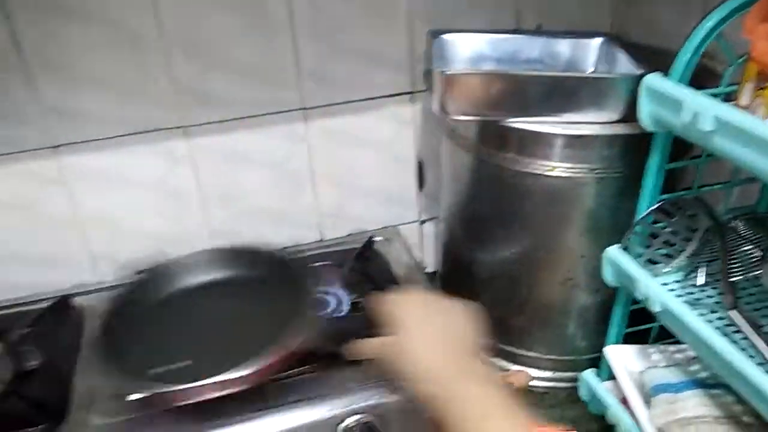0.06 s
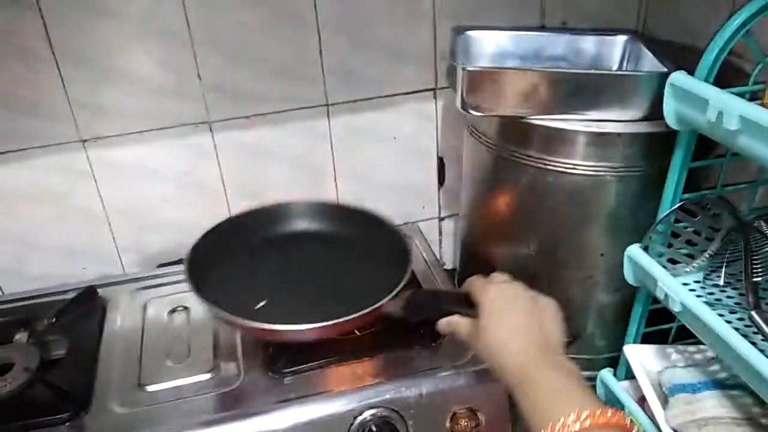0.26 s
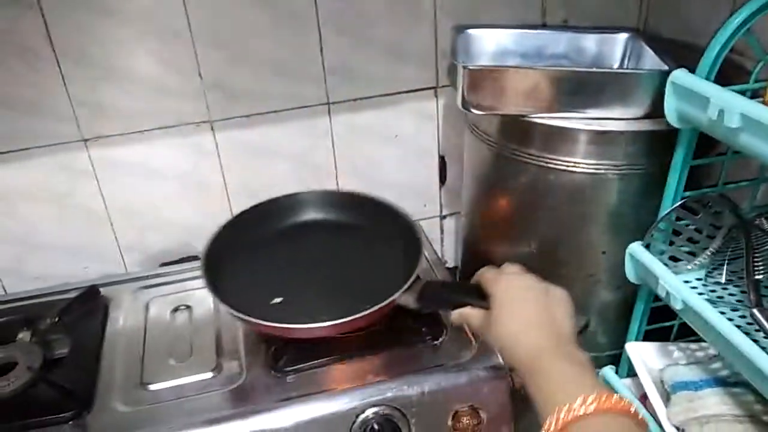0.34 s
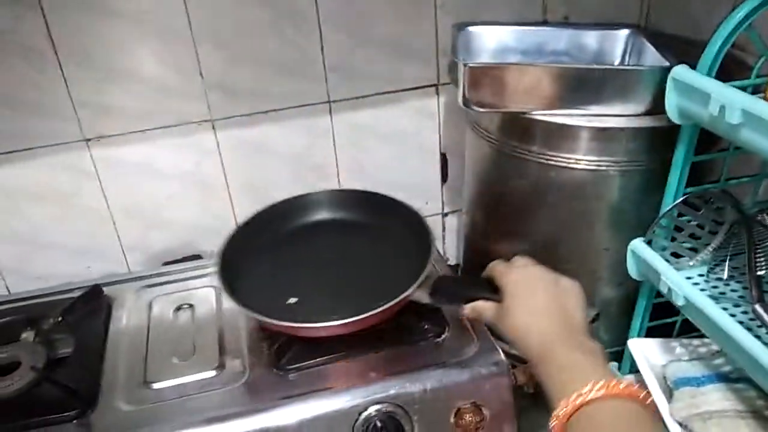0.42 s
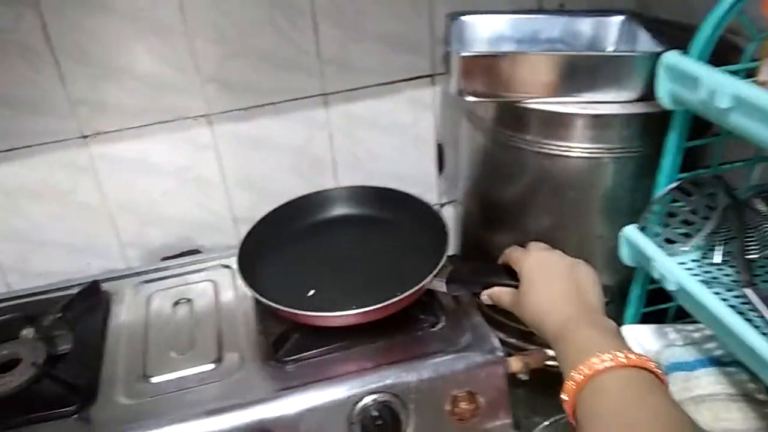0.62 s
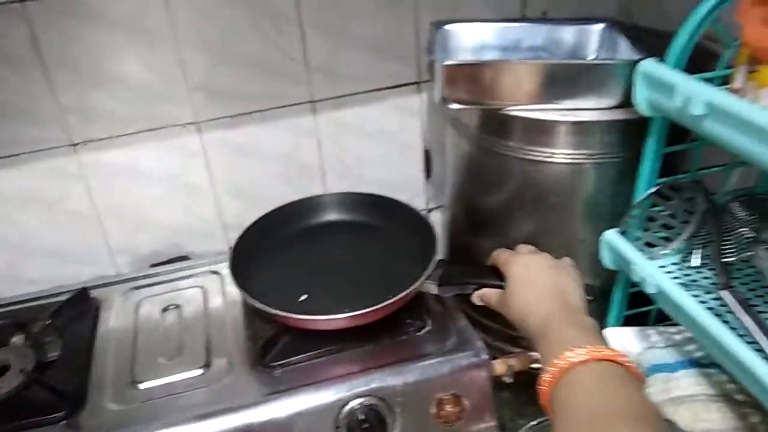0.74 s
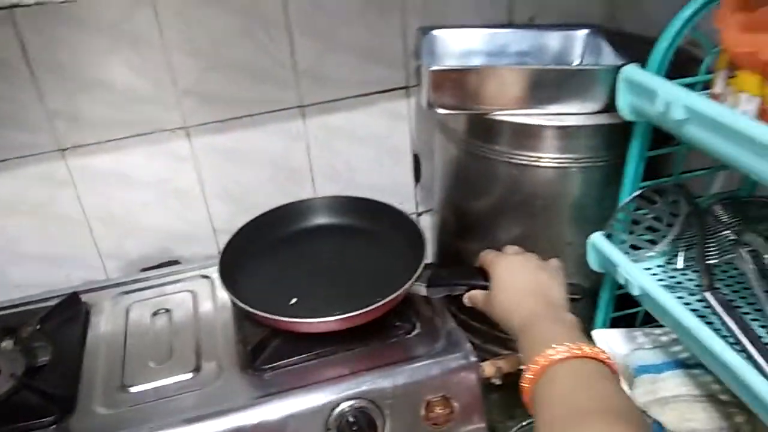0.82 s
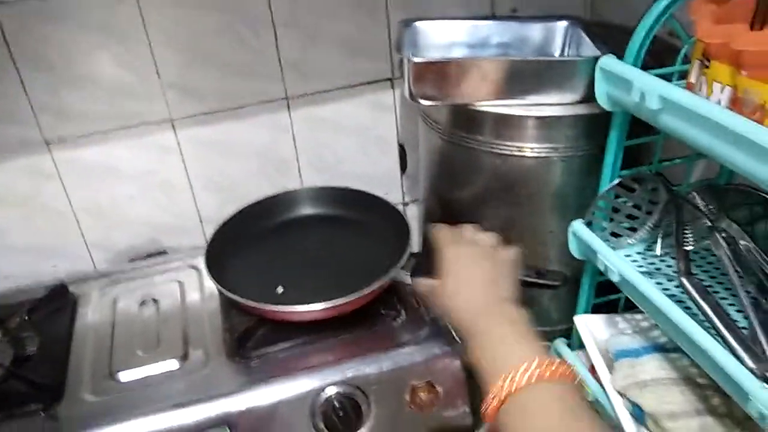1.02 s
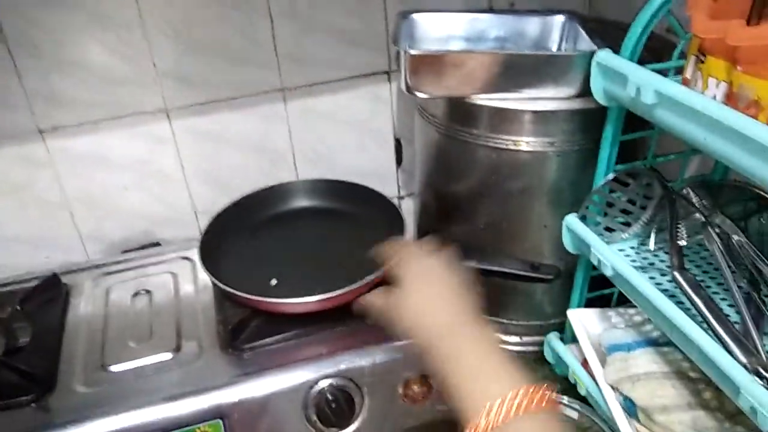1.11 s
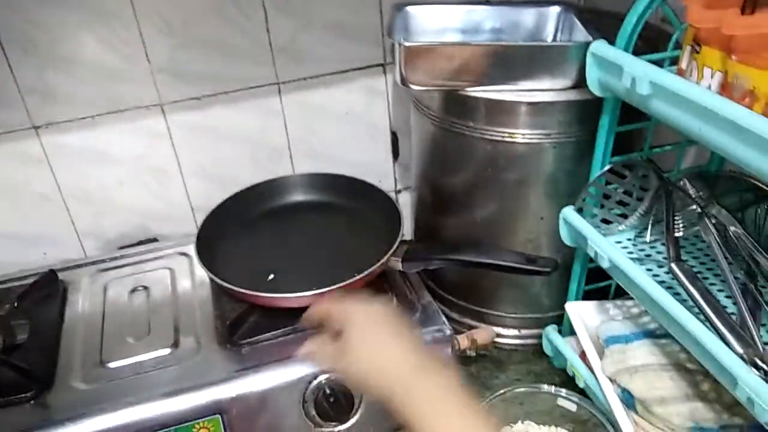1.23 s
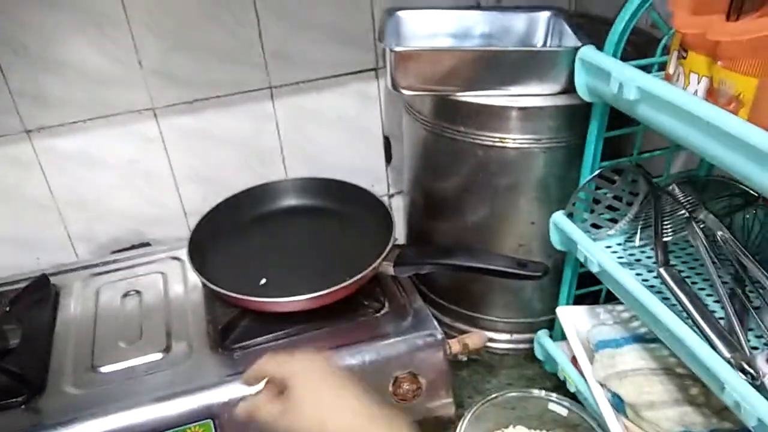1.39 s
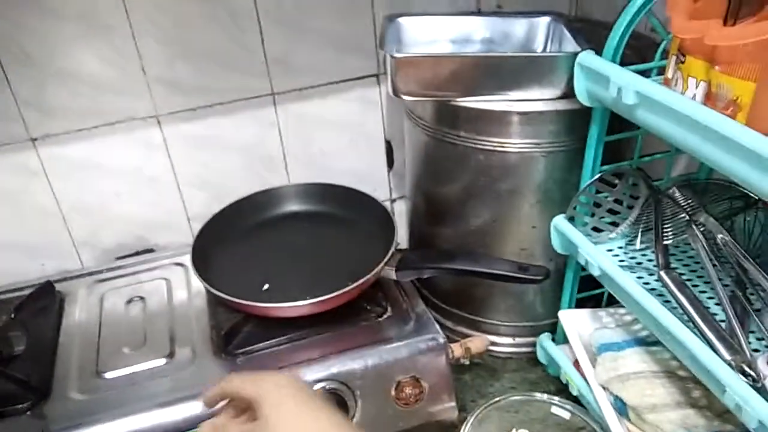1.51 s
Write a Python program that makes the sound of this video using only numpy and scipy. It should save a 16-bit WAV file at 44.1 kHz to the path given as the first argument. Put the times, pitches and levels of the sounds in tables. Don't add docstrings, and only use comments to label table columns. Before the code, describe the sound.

A frying pan clatters down onto a gas stove's iron grate, then shifts and settles

```python
import sys
import numpy as np
from scipy import signal
from scipy.fft import rfft, irfft, next_fast_len
from scipy.io import wavfile
from scipy.ndimage import uniform_filter1d, minimum_filter1d

SR = 44100
rng = np.random.default_rng(int(sys.argv[2]) if len(sys.argv) > 2 else 0)


def persist_wave(psi):
    counts = np.round(np.clip(psi, -1, 1) * 32767).astype(np.int16)
    wavfile.write(sys.argv[1], SR, np.atleast_2d(counts).T)


def volts_from_db(level):
    exponent = np.asarray(level, float) / 20
    return 10 ** exponent


N = 68355
T = np.arange(N) / SR


def pan_contacts():
    # time in seconds, force in dB.
    landing = [(.187, -51.5), (.197, -22.5), (.207, -8.5), (.241, -13.5), (.3, -22.5), (.331, -31.5),
               (.421, -49.5), (.471, -55.5)]
    shift = [(.608, -27.5), (.615, -23), (.651, -28), (.657, -14), (.675, -24.5), (.721, -27), (.786, -46)]
    settling = [(.787, -28), (.796, -19), (.816, -20.5), (.851, -33), (.961, -57)]
    # frequency in Hz, density in dB per Hz.
    landing_tone = [(131, -26), (450, -4.5), (720, -2), (1000, 0.5), (1400, -1.5), (3200, -7.5),
                    (4350, -0.5), (6201, -13), (14400, -34)]
    shift_tone = [(131, -36.5), (601, -9.5), (1101, -1.5), (2341, -8.5), (4501, -6), (5501, -17),
                  (7501, -25), (14400, -40.5)]
    settling_tone = [(201, -22.5), (501, -2), (951, 3.5), (2301, 3), (4301, 7.5), (5201, -2), (7001, -16.5),
                     (14400, -32.5)]
    noise = chatter(landing, landing_tone, t60=.08, dulls=.9, count=600)
    noise = noise + chatter(shift, shift_tone, t60=.12, dulls=.9, count=350)
    return noise + chatter(settling, settling_tone, t60=.07, dulls=.5, count=600)


def chatter(force, tone, t60, dulls, count):
    hz = rng.uniform(np.sqrt(150), np.sqrt(14700), count) ** 2
    t = T[:SR // 6, None]
    life = t60 * (hz / 1000) ** -.15
    decay = volts_from_db(along(tone, hz) + 3 * rng.standard_normal(count) - 60 * t / life)
    weight = np.sqrt(np.sqrt(hz) / life)
    onset = 1 - np.exp(-t * hz)
    body = (decay * weight * np.sin(2 * np.pi * hz * t) * onset).sum(1)

    spectrum = rfft(body)
    power = uniform_filter1d(np.abs(spectrum) ** 2, size=45)
    target = volts_from_db(along(tone, np.fft.rfftfreq(len(body), 1 / SR)))
    body = irfft(spectrum * target / np.sqrt(power), len(body))[:SR // 8]

    push = rng.standard_normal(N) * volts_from_db(2.5 * wobble(1, 110)[0])
    gain = level_curve(force)
    dull = filtered(push, lambda f: 1 / (1 + (f / 5600) ** 4))
    push = dull + (push - dull) * (gain / gain.max()) ** dulls
    shaken = signal.fftconvolve(push * gain, body / np.linalg.norm(body))[:N]
    return filtered(shaken, lambda f: 1 / (1 + (220 / (f + 1)) ** 4))


def pan_ringing():
    # frequency in Hz, level in dB, t60 in seconds.
    stove_top = [(160, -19.5, 0.48), (454.5, -7.5, 0.36), (683, -10.5, 0.17), (724, -1.5, .25),
                 (918, -11, 0.32), (1262, -7.5, 0.65), (1334, -17, .3), (1520, -3, 0.16),
                 (2013, -2.5, 0.26), (2408, -0.5, .2), (4410, -2, 0.36)]
    free_pan = [(1082, -18, .5), (1238, -6, .04), (1480, -9, .12), (1950, -12, .08), (2799, -7, 2),
                (3391, -6, 2), (3811, -17, 2), (4517, -15, .5), (4958, -1, .1), (5814, -14, .25),
                (7510, -10, .045), (8473, -20, .07), (9162, -22, .06), (9620, -26, .08)]
    pan_and_grate = [(899, -12, .9), (1031, -11, .6), (1096, -4, .4), (1140, -10, .5), (1301, -10, 1.0),
                     (1745, -10, .15), (2164, -11, .3), (2797, -17, 1.0), (3079, -20, .45),
                     (3390, -12, .28), (3800, -6, .25), (4384, 0, .3), (5227, -17, .2), (6218, -27, .26)]
    second_knock = [(921, -3, .3), (1031, -9, .25), (1187, -12, .3), (1785, -21, 2)]
    pan_at_rest = [(463, -19, 0.39), (792, -18, 0.26), (860, -0.5, 0.1), (1105, -34, 1.4),
                   (1151, 6.5, 0.083), (1186.5, -16.5, 1.31), (1548, -23, 0.75), (2346, -5, 0.11),
                   (3330, 3, 0.093), (3780, -6, .2), (4170, 7, 0.055), (4453, -7, 0.29), (4900, -2, 0.095)]
    light_knock = [(320, -16, .1), (600, -14, .08), (868, -11, .28), (1055, -6, .09), (1262, -12, .3),
                   (1350, 0, .08), (1745, -8, .06), (2365, -12, .12), (2450, -6, .04)]
    # start in seconds, level in dB, attack in seconds, time of damping in seconds.
    strikes = [
        (0.225, -14.5, 0.007, 0.42),
        (0.612, -12.5, 0.011, 0.63),
        (.654, -14.5, 0.0096, 0.81),
        (0.699, -10, 0.002, 0.73),
        (0.79, -16, 0.01, 1.135),
    ]
    # seconds, dB, seconds, seconds.
    tap_strike = (.479, -30, .002, .535)
    bodies = (stove_top, free_pan, pan_and_grate, second_knock, pan_at_rest, light_knock)
    return sum(ring(modes, *strike) for modes, strike in zip(bodies, [*strikes, tap_strike]))


def ring(modes, start, db, attack, damped):
    damp_t60 = 0.068
    waver_db, drift_rad = 1.6, .35
    hz, mode_db, t60 = np.transpose(modes)[..., None]
    now = (T >= start) & (T < damped + 2 * damp_t60)
    t = T[now] - start
    waver = waver_db * wobble(len(hz), 1000)[:, now]
    drift = drift_rad * wobble(len(hz), 900)[:, now]
    phase = 2 * np.pi * (hz * t + rng.random(hz.shape)) + drift
    lines = volts_from_db(mode_db + waver - 60 * t / t60) * np.sin(phase)
    choke_db = -60 * np.maximum(T[now] - damped, 0) / damp_t60
    out = np.zeros(N)
    out[now] = lines.sum(0) * (1 - np.exp(-t / attack)) * volts_from_db(db + choke_db)
    return out


def base_knocks():
    # time of the peak in seconds, peak level in dB, pitch in Hz, half length in seconds.
    blunt = [(.198, -27.5, 189, 0.0036), (0.199, -28, 625, 0.0065), (0.235, -11, 1454, 0.0063),
             (.259, -22.5, 597, 0.0058), (.281, -15, 1150, 0.0023), (0.658, -33, 177, 0.0049),
             (0.66, -2.5, 1065, 0.0034), (0.7067, -10, 960, 0.0011), (0.721, -12, 1100, 0.00096),
             (.804, -16.5, 889, .006), (1.164, -38.5, 940, 0.0022), (1.175, -44, 950, 0.0018),
             (1.183, -37, 930, 0.0081), (1.183, -41, 1074, 0.013)]
    s, db, hz, half = np.transpose(blunt)[..., None]
    bell = np.exp(-((T - s) / half) ** 2)
    return (volts_from_db(db) * bell * np.cos(2 * np.pi * hz * (T - s))).sum(0)


def small_contacts():
    # start in seconds, level in dB, pitch in Hz, bandwidth in Hz, length in seconds.
    contacts = [(.0, -49.5, 2180, 2550, 0.061), (0.115, -54.5, 4320, 614, 0.058),
                (0.396, -54.5, 8340, 1500, 0.0047), (0.478, -60, 9400, 6000, 0.019),
                (0.512, -46.5, 4500, 1295, 0.04), (0.57, -50.5, 3670, 2550, 0.054),
                (0.199, -19, 4870, 700, 0.023), (0.202, -17, 2360, 402, 0.023),
                (0.21, -6.5, 4400, 616, 0.018), (0.226, -8, 4450, 396, 0.0092),
                (0.234, -1, 4150, 503, .012), (0.258, -13, 4500, 510, 0.023),
                (0.289, -22, 4300, 600, 0.029), (.808, -18.5, 4100, 900, 0.014),
                (0.827, -18, 4150, 1160, 0.0055), (0.902, -52.5, 8300, 1970, 0.014),
                (0.985, -42, 4500, 500.5, 0.0091), (.905, -38.5, 4450, 700, 0.015),
                (1.124, -49, 4600, 980, 0.03), (1.212, -56.5, 2733, 300, .06),
                (1.377, -52.5, 2150, 300, 0.044), (1.379, -46.5, 2544, 300, 0.019),
                (1.389, -57.5, 3480, 500, 0.083), (1.05, -57, 2150, 250, 0.017),
                (1.107, -61, 2150, 250, .015), (1.42, -55, 2270, 502, 0.023),
                (1.43, -66.5, 13400, 2000, 0.038), (1.491, -59.5, 8430, 990, 0.014),
                (1.505, -56, 1100, 700, 0.019), (.0, -60, 8900, 2500, .03), (0.089, -65, 10000, 6000, .006),
                (0.205, -36, 10450, 7100, 0.013), (0.571, -59.5, 10580, 5000, 0.0068),
                (0.654, -44.5, 8200, 6000, 0.011), (0.052, -58.5, 473, 150, 0.092),
                (1.326, -63.5, 192.6, 50, .2), (0.787, -50, 12000, 5000, 0.017)]
    out = np.zeros(N)
    for s, db, hz, width, length in contacts:
        u = np.maximum(T - s, 0) / length
        puff = unit(filtered(rng.standard_normal(N), lambda f: resonance(f, hz, width) ** 2))
        out += volts_from_db(db) * puff * (1 - np.exp(-12 * u)) * np.exp(-1.6 * u ** 1.6)
    return out


def flame_in_pan():
    # frequency in Hz, bandwidth in Hz, level in dB.
    resonances = [(300, 44, -7), (590, 32, -4), (1150, 172, -4.5), (2150, 110, -19.5), (2910, 150, -10),
                  (4500, 460, -8.5), (6530, 150, -24)]
    # time in seconds, level in dB.
    course = [(.85, -53), (1.02, -54), (1.26, -51.5), (1.32, -61)]

    def response(f):
        return sum(volts_from_db(db) * resonance(f, hz, width) ** 2 for hz, width, db in resonances)

    return level_curve(course) * unit(filtered(rng.standard_normal(N), response))


def flame_rumble():
    # time in seconds, level in dB.
    course = [(0, -65), (.03, -55.5), (.14, -59), (.18, -64), (.21, -34.5), (.28, -43), (.4, -54),
              (.47, -64), (.6, -67), (.7, -45), (.85, -53), (.9, -73), (.99, -70), (1.02, -47), (1.09, -58),
              (1.22, -48), (1.42, -61.5), (1.55, -58.5)]
    # frequency in Hz, density in dB per Hz.
    spectrum = [(20, -22), (48, -16.5), (72, 2.5), (100, -2), (125, -29.5), (170, -17.5), (300, -33),
                (450, -43)]
    rumble = unit(filtered(rng.standard_normal(N), lambda f: volts_from_db(along(spectrum, f))))
    power = np.abs(uniform_filter1d(rumble ** 2, size=1500))
    return level_curve(course) * unit(rumble / (np.sqrt(power) + 0.315))


def gas_hiss():
    # time in seconds, level in dB.
    course = [(0, -54), (.07, -58.5), (.17, -57), (.55, -53.5), (.95, -53), (1.28, -59), (1.31, -60.5),
              (1.365, -60.5), (1.38, -58.5), (1.55, -59)]
    # frequency in Hz, density in dB per Hz.
    spectrum = [(65, -57.5), (110, -20), (244, -24), (564, -17.5), (691, -16), (1410, -16.5), (3130, -20.5),
                (4440, -21), (14500, -46)]
    z = signal.stft(rng.standard_normal(N + 512), nperseg=512)[2]
    patches = uniform_filter1d(rng.standard_normal(z.shape), size=6, axis=0)
    patches = uniform_filter1d(patches, size=8, axis=1)
    patchy = signal.istft(z * volts_from_db(2.4 * unit(patches)), nperseg=512)[1][:N]
    hiss = unit(filtered(patchy, lambda f: volts_from_db(along(spectrum, f)) * (f > 100)))
    return level_curve(course) * hiss


def kitchen(x):
    # frequency in Hz, t60 in seconds.
    decay = [(200, 0.33), (2000, 0.2), (10000, 0.054)]
    hz, t, z = signal.stft(rng.standard_normal(SR // 2), SR, nperseg=256)
    fading = z * volts_from_db(-60 * t / along(decay, hz)[:, None])
    tail = signal.istft(fading, SR, nperseg=256)[1]
    return signal.fftconvolve(x, tail / np.linalg.norm(tail))[:N]


def two_ports(mid):
    # frequency in Hz, level in dB.
    apart = [(3000, -90), (5000, -40), (6500, -22), (9000, -19), (12000, -7)]
    scatter = rng.standard_normal(900)
    scattered = signal.fftconvolve(mid, scatter / np.linalg.norm(scatter))[:N]
    side = filtered(scattered, lambda f: volts_from_db(along(apart, f)))
    return np.array([mid + side, mid - side])


def unit(x):
    return x / np.sqrt(np.mean(x ** 2) + 1e-20)


def along(points, hz):
    f, v = np.transpose(points)
    return np.interp(np.log(hz + 1), np.log(f + 1), v)


def level_curve(rows):
    s, db = np.transpose(rows)
    return volts_from_db(np.interp(T, s, db, left=-140, right=-140))


def filtered(x, response):
    m = next_fast_len(N + 8192)
    return irfft(rfft(x, m) * response(np.fft.rfftfreq(m, 1 / SR)), m)[:N]


def resonance(f, hz, width):
    return 1j * f * width / (hz * hz - f * f + 1j * f * width)


def wobble(count, step):
    knots = rng.standard_normal((count, N // step + 2))
    return np.array([np.interp(np.arange(N) / step, np.arange(len(k)), k) for k in knots])


def scene():
    near = pan_contacts() + pan_ringing() + base_knocks() + small_contacts()
    burner = flame_in_pan() + flame_rumble() + gas_hiss()
    return two_ports(near + volts_from_db(-12) * kitchen(near) + burner)


def top_cut(x):
    return signal.sosfilt(signal.butter(12, 14870, fs=SR, output="sos"), x)


def record(dry):
    need = np.minimum(1, .7 / (np.abs(dry).max(0) + 1e-9))
    held = dry * uniform_filter1d(minimum_filter1d(need, size=180), size=180)
    mix = np.array([filtered(c, lambda f: np.clip((14400 - f) / 200, 0, 1)) for c in held])
    return top_cut(mix)


dry = scene()
out = record(dry)
persist_wave(out)
```